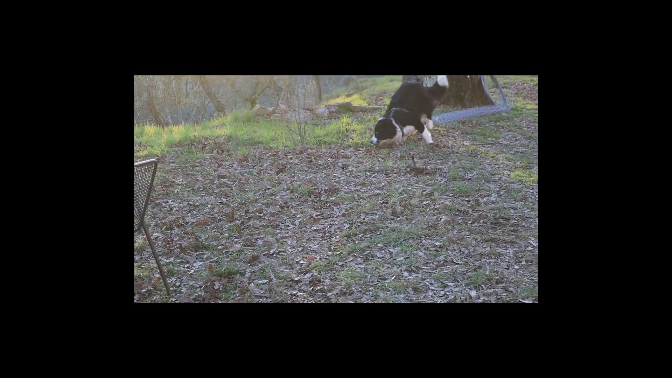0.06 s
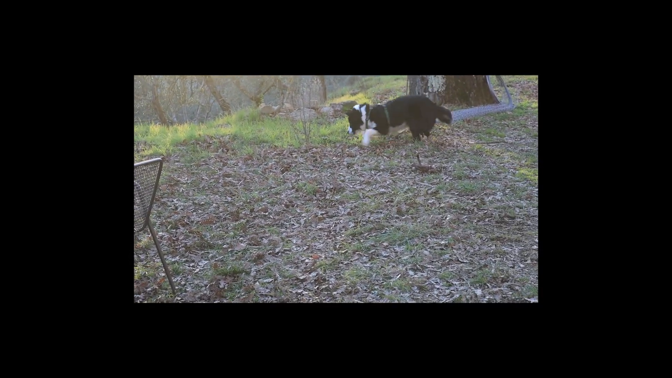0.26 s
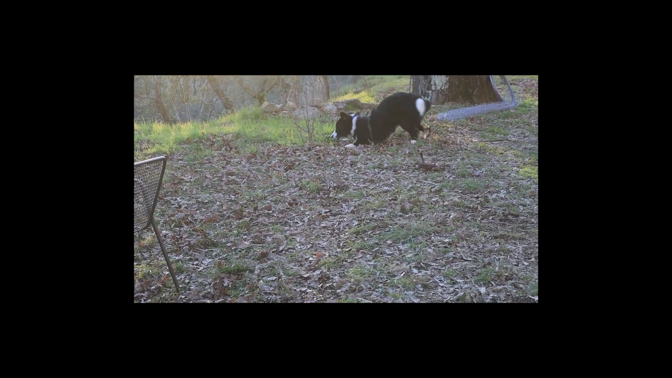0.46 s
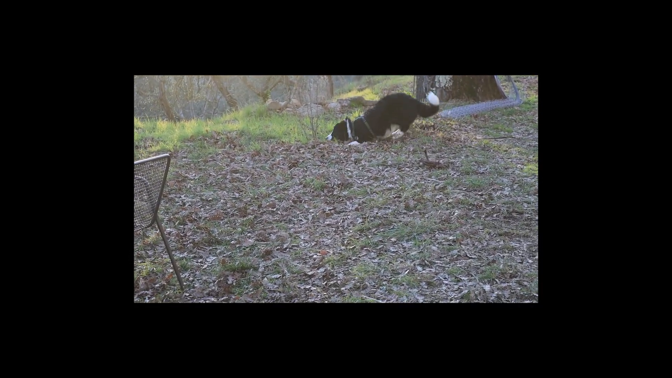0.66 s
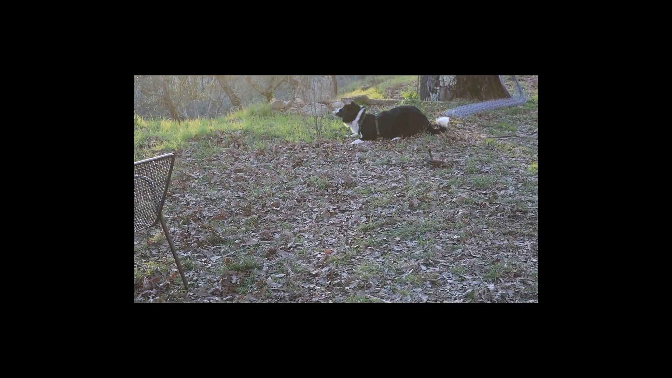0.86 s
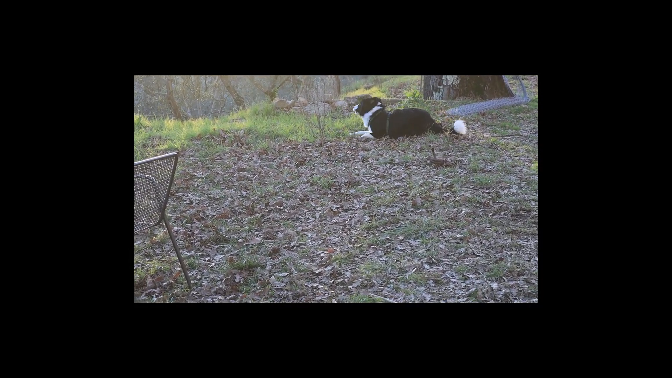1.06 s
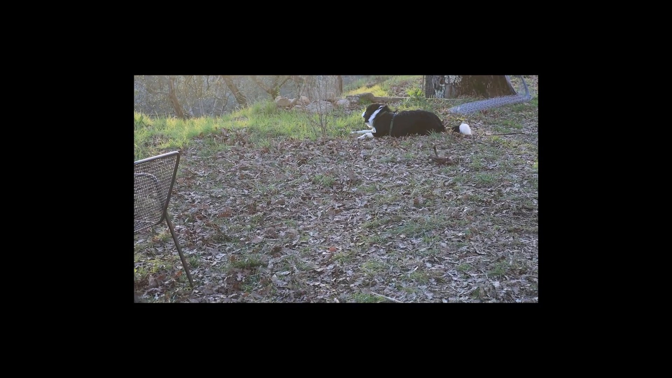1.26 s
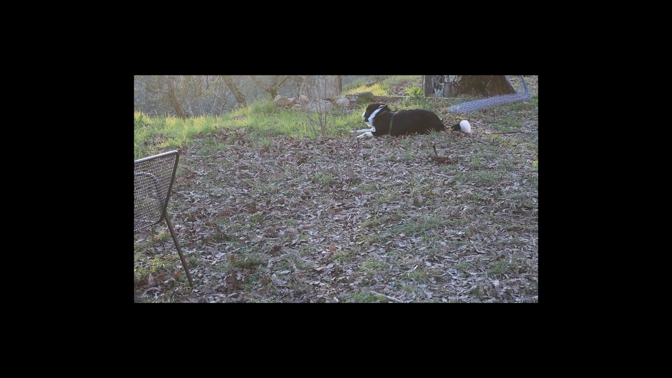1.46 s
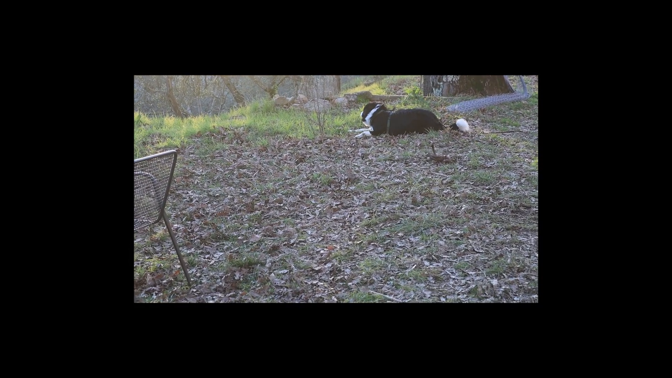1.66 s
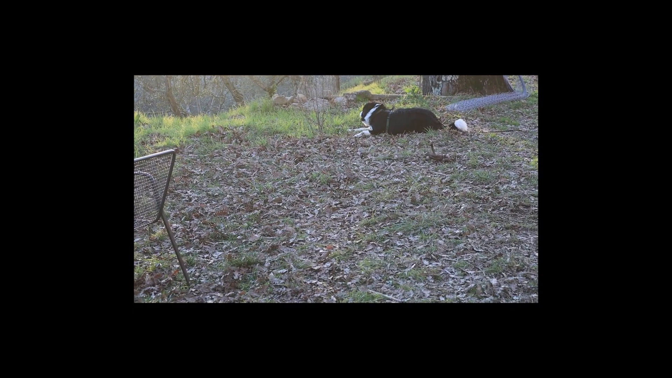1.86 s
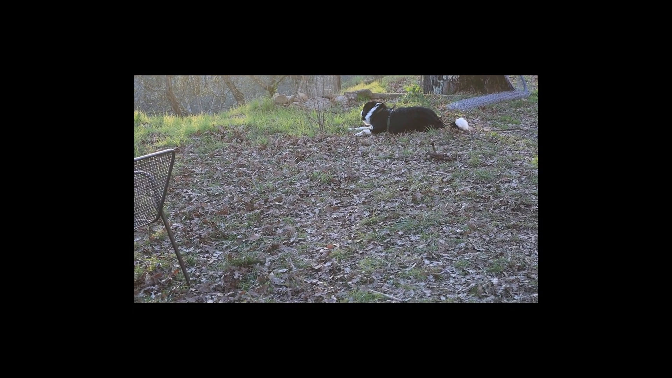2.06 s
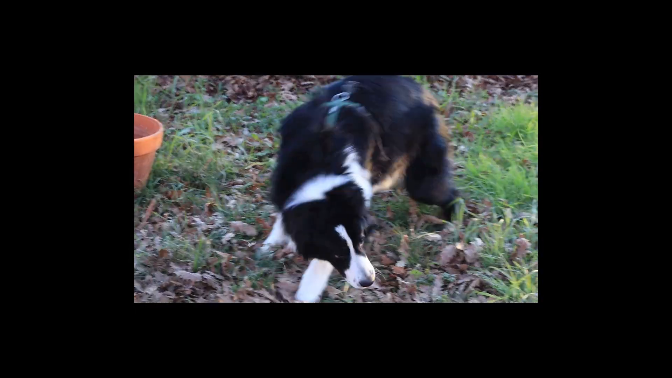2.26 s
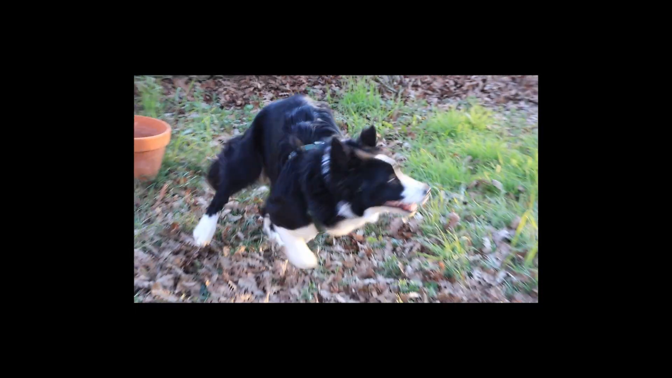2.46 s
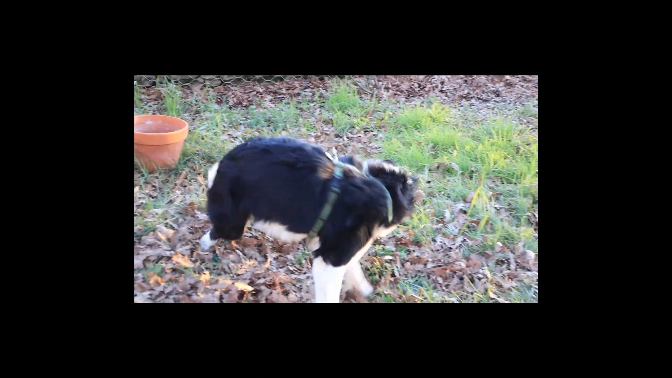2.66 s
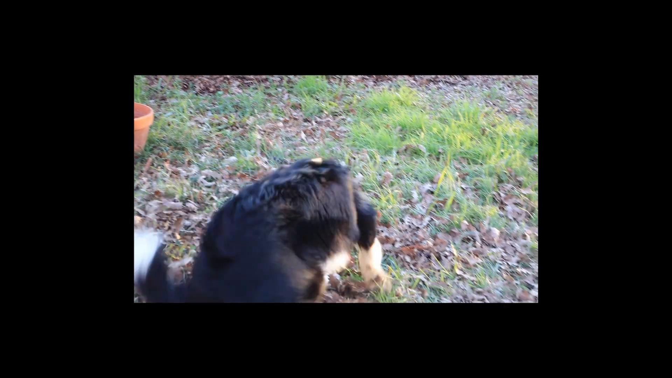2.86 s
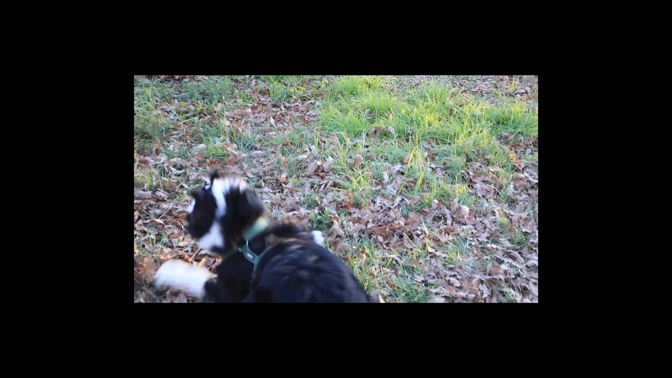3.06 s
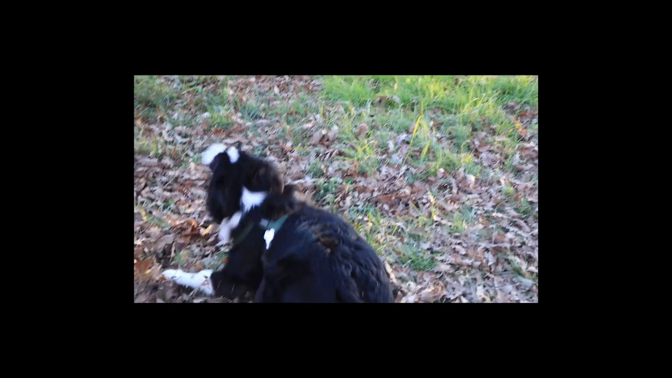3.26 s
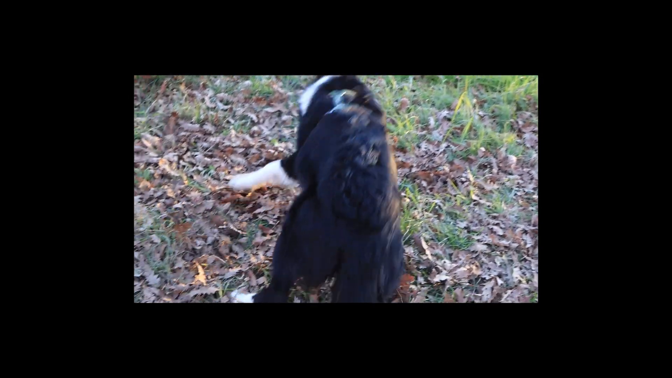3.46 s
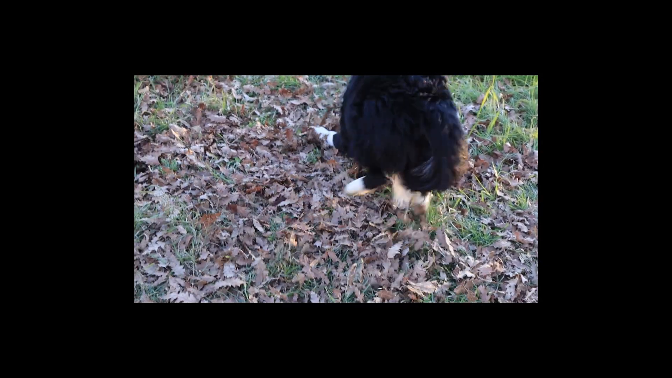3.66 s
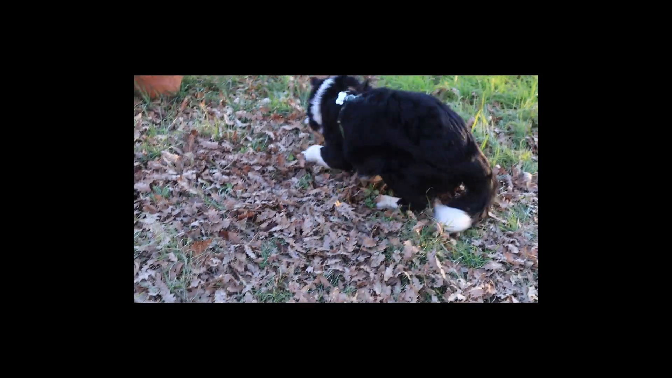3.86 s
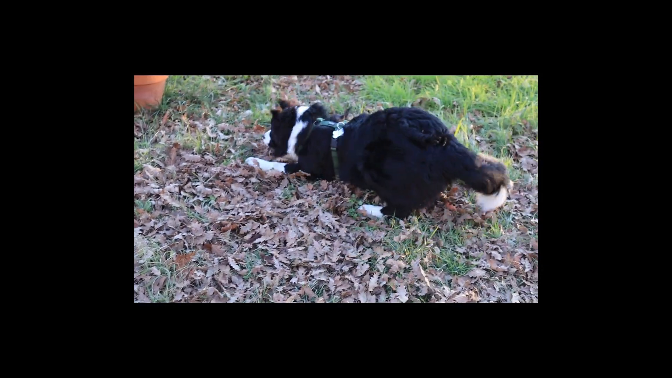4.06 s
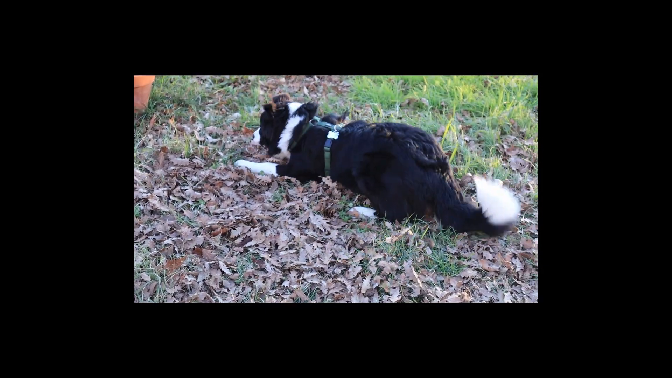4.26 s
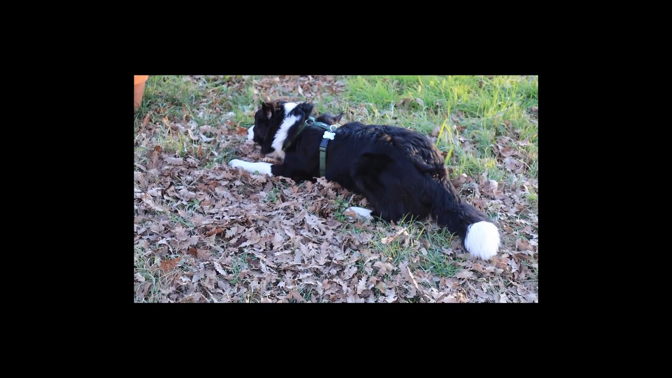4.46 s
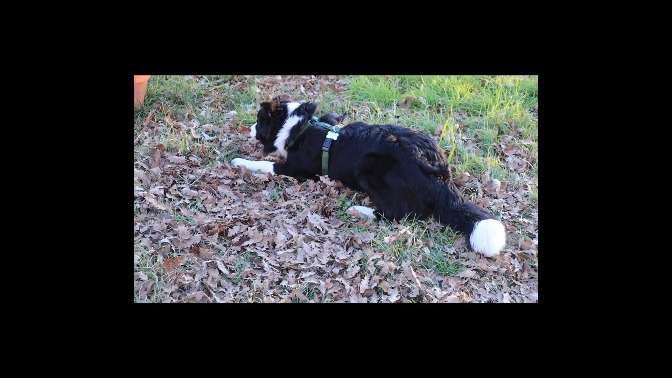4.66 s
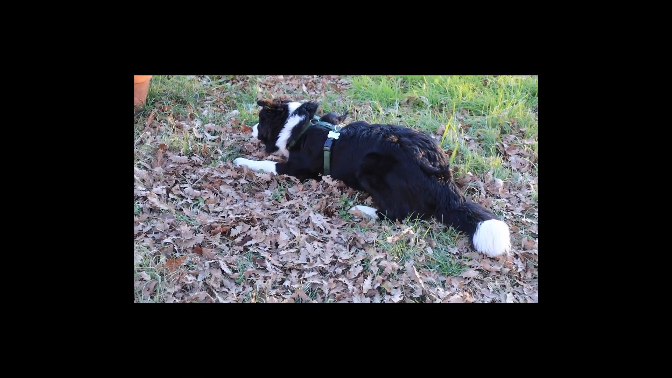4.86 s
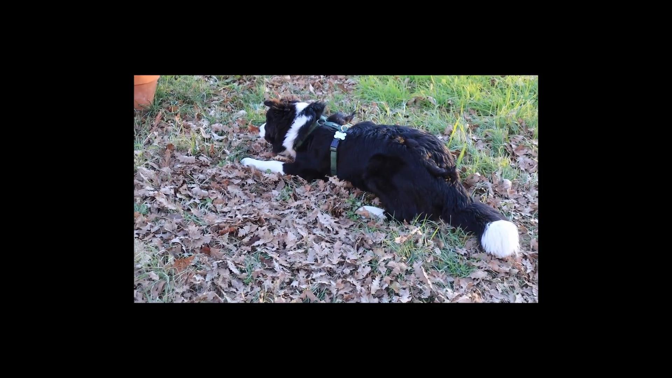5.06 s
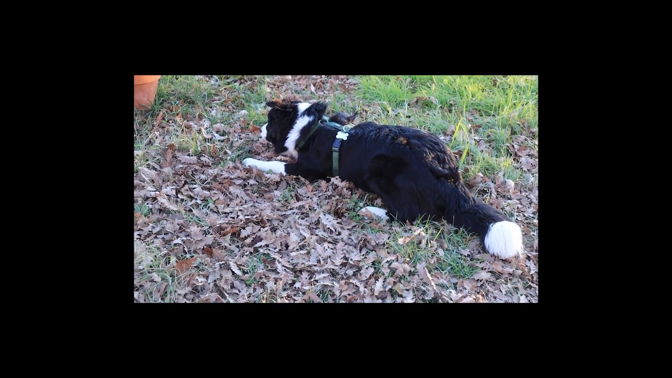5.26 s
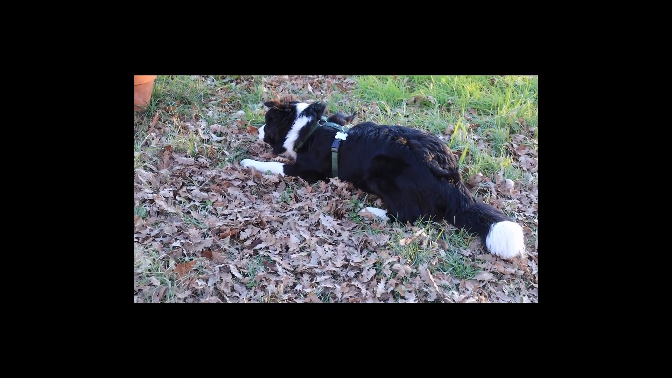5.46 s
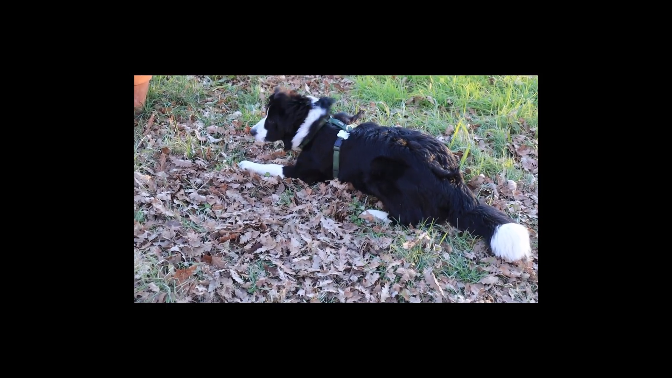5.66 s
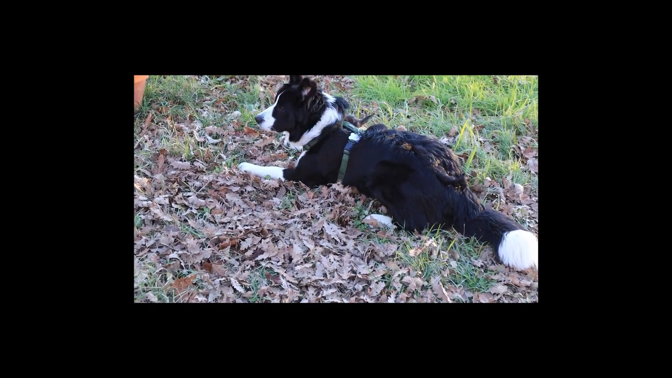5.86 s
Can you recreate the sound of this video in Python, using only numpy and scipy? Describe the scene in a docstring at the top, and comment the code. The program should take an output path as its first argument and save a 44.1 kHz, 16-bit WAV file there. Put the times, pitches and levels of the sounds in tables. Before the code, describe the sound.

A quiet open yard with soft outdoor hush. From 0 to about 1.4 s a dog scuffles in dry leaves at a distance: short, blurred rustling bursts, strongest in the first half second, fading into a lull. At 1.7 s two very quick, faint hollow knocks sound far away with a scattered echo. At 2.25 s the perspective jumps close: bright, crisp leaf crunching in irregular bursts, with paw stamps and dull soil thuds. A loud hard bump on the camera comes at 2.55-2.65 s, with low wind rumble around it. The densest crunching and sharp snaps fall around 2.7-3.2 s; tiny metallic tag clinks come near 2.45, 2.8, 3.3 and 4.05 s. More crushing continues around 3.6-4.1 s, then thins. From 4.4 s leaves tick and settle while a faint wavering drone drifts far off. From 5.4 s small snaps and a gentle rustle grow under the lying dog until the end.

```python
"""A dog scuffles through dry leaves across a yard, then a hollow double knock comes from afar in the lull.
It goes on close by: paws crush leaves, stalks snap, its collar tag clinks, and something bumps the camera.
At last the leaves settle and rustle under the lying dog, over faint outdoor air, low wind and a faint far drone.
Leaves are swarms of tiny noise clicks, hard objects are dying sine modes, and air and wind are filtered noise."""
import sys
import numpy as np
from scipy import signal
from scipy.fft import rfft, irfft
from scipy.io import wavfile
from scipy.ndimage import uniform_filter1d

SR = 44100
rng = np.random.default_rng(int(sys.argv[2]) if len(sys.argv) > 2 else 0)


def waveform_to_disk(signal):
    """Save audio, clipped to [-1, 1], as 16-bit WAV at the path in sys.argv[1]."""
    frames = np.transpose(np.atleast_2d(signal))
    scaled = np.clip(frames, -1, 1) * 32767
    samples = np.round(scaled).astype(np.int16)
    wavfile.write(sys.argv[1], SR, samples)


N = 260631
TIME = np.arange(N) / SR
NEAR_FROM, LYING_FROM = 2.24, 5.49  # s, the dog is close by, then lying in the leaves


def amp(db):
    """Decibels to gain."""
    return 10 ** (np.asarray(db) / 20)


def unit(x):
    """Scales to rms 1."""
    return x / np.sqrt(np.mean(x ** 2) + 1e-20)


def add(mix, s, sound):
    """Mixes a sound in at time s, cut off at the end of the mix."""
    part = mix[round(s * SR):][:len(sound)]
    part += sound[:len(part)]


def shape(points, hz):
    """Gain of a spectrum (Hz, dB) at the given frequencies, interpolated over log frequency."""
    f, db = np.transpose(points)
    return amp(np.interp(np.log(hz + 1), np.log(f), db))


def coloured(x, points):
    """Gives x a spectrum, at rms 1."""
    return unit(irfft(rfft(x) * shape(points, np.fft.rfftfreq(N, 1 / SR)), N))


def burst(centre_hz, decay, octaves):
    """A brief fracture: fast-dying noise in a band reaching so many octaves each way, peak 1."""
    t = np.arange(SR // 2) / SR
    edges = np.clip([centre_hz / 2 ** octaves, centre_hz * 2 ** octaves], 20, SR / 2 - 100)
    band = signal.butter(1, edges, "band", fs=SR, output="sos")
    x = signal.sosfilt(band, rng.standard_normal(len(t)) * np.exp(-t / decay))
    return x / abs(x).max()


def ring(modes):
    """Dying modes after one blow, each starting at a random phase."""
    t = np.arange(SR // 2) / SR
    out = np.zeros(len(t))
    for hz, db, t60 in modes:
        out += amp(db - 60 * t / t60) * np.sin(2 * np.pi * (hz * t + rng.random()))
    return out


# Colour of the outdoor hush. Each row: frequency in Hz, relative level in dB per Hz.
AIR = [(60, -1), (160, -5.5), (300, -8), (470, -9.5), (930, -14), (2500, -19), (6000, -21), (15800, -25.5)]
AIR_DB = -64.5
# Colour of the wind on the microphone. Each row: frequency in Hz, relative level in dB per Hz.
WIND = [(8, -9.5), (25, 8.5), (45, -2), (70, -13), (130, -25), (300, -43), (900, -92)]
# Swells of the wind. Each row: time of the top in seconds, half width in seconds, level in dB.
GUSTS = [(2.68, 0.21, -46), (3.38, 0.09, -48), (4.3, 0.58, -56), (5.45, 0.25, -55)]
CALM_DB = -64  # wind between the swells


def air():
    """Even outdoor hush, and a low wind rumble whose power swells once the dog is near."""
    hush = amp(AIR_DB) * coloured(rng.standard_normal(N), AIR)
    gust_power = sum((amp(db) * np.exp(-((TIME - s) / width) ** 2 / 2)) ** 2 for s, width, db in GUSTS)
    strength = np.sqrt(amp(CALM_DB) ** 2 + gust_power * (TIME > NEAR_FROM))
    return hush + strength * coloured(rng.standard_normal(N), WIND)


# A faint far drone that drifts in pitch. Each row: time in seconds, pitch in Hz, level in dB.
DRONE = [(4.4, 515, -81), (4.719, 495, -68), (4.949, 400, -72), (5.2, 414, -72.5), (5.6, 478, -74)]


def drone(width_hz=36):
    """A narrow, fuzzy tone from far away: slow noise riding on a gliding sine."""
    s, hz, db = np.transpose(DRONE)
    slow = signal.butter(2, width_hz, fs=SR, output="sos")
    fuzz = unit(signal.sosfilt(slow, rng.standard_normal(N)))
    glide = np.sin(2 * np.pi * np.cumsum(np.interp(TIME, s, hz)) / SR)
    return unit(fuzz * glide) * np.interp(TIME, s, amp(db), left=0, right=0)


# Blows on something hollow. Each row: start in seconds, level in dB.
KNOCKS = [(1.722, -55.5), (1.7895, -57)]
# Modes of the hollow thing. Each row: frequency in Hz, relative level in dB, time to fall 60 dB in seconds.
HOLLOW = [(453, 2, 0.23), (608, -4, 0.12), (688, -2, .08), (807, 3.5, 0.094), (885, -1.5, 0.19),
          (1010, -15, .1), (1147, -11.5, 0.21)]


def far_knocks():
    """Something hollow is struck twice beyond the yard; its modes speak softly into a scattered echo."""
    out, t = np.zeros(N), np.arange(SR // 2) / SR
    for s, db in KNOCKS:
        add(out, s, amp(db) * ring(HOLLOW) * (1 - np.exp(-t / 0.00071)))
    echo = rng.standard_normal(len(t)) * amp(-60 * t / 0.34)
    return out + amp(1.5) * signal.oaconvolve(out, echo / np.linalg.norm(echo))[:N]


# Modes of the metal collar tag. Each row: frequency in Hz, relative level in dB, time to fall 60 dB in seconds.
TAG = [(6236, -2, 0.1), (6430, 1, 0.081), (7650, 3, 0.11), (9200, -10, .066), (9700, -2.5, .04),
       (13348, -8, 0.051), (13600, 5, 0.042)]
# Clinks of the tag. Each row: start in seconds, level in dB.
CLINKS = [(2.454, -46), (2.775, -36), (2.792, -44), (3.292, -31), (4.06, -39)]


def tag():
    """The dog's collar tag clinks: each blow sets its high metal modes ringing."""
    out = np.zeros(N)
    for s, db in CLINKS:
        add(out, s, amp(db) * ring(TAG))
    return out


# Bumps on the camera. Each row: start in seconds, contact level in dB, hardness as the contact's
# upper frequency limit in Hz, level of the mount's sway in dB.
BUMPS = [(2.5491, -13, 1380, -37.5), (2.6307, -20, 15000, -38), (2.6306, -17.5, 10500, -23.5),
         (2.6351, -26.5, 6500, -58)]
# Boom and brief ring of the case. Each row: frequency in Hz, relative level in dB, time to fall 60 dB in seconds.
CAMERA = [(189, -17, 0.17), (265, -11.5, 0.057), (710, -7.5, .01), (936, -2.5, 0.018), (1300, -4.5, .012),
          (1590, -5.5, 0.014), (2224, -6.5, .012), (3170, 4, 0.0097), (3750, -2.5, .009),
          (4100, 5.5, 0.0082), (4700, -0.5, 0.019), (5680, 9.5, 0.0084), (7700, -11, 0.013),
          (9700, 0.5, 0.016), (11100, 3.5, 0.011), (12800, 0.5, .01)]


def bumps(sway_hz=44, sway_t60=0.34, push_time=0.0011):
    """A contact pushes the camera and rings its case, brighter when harder, and sets its mount swaying."""
    out, t = np.zeros(N), np.arange(SR // 2) / SR
    sway = np.sin(2 * np.pi * sway_hz * t) * amp(-60 * t / sway_t60)
    push = amp(-8) * (1 - t / push_time) * np.exp(-t / push_time)
    for s, db, hard_hz, sway_db in BUMPS:
        hardness = signal.butter(3, min(hard_hz, SR / 2 - 100), fs=SR, output="sos")
        scrape = amp(10.5) * burst(4600, decay=0.0018, octaves=0.9)
        thump = amp(-2) * burst(89, decay=0.025, octaves=0.47)
        contact = signal.sosfilt(hardness, push + ring(CAMERA) + scrape)
        add(out, s, amp(db) * contact + amp(sway_db) * (sway + thump))
    return out


# Far landings of the dog. Each row: time of the top in seconds, level in dB, rise in dB per second.
POUNCES = [(0.018, -40, 450), (0.052, -44, 300), (0.222, -44.5, 419), (0.355, -46.5, 398), (0.39, -54, 400),
           (0.474, -40.5, 365), (0.678, -50.5, 164), (0.812, -48, 322), (1.135, -48, 74.5),
           (1.328, -55, 131)]
POUNCE_FADE_DB_PER_S = 164
# shuffling between the landings: crackle level, when it starts to fade, and the fade
SHUFFLE_DB, SHUFFLE_END_S, SHUFFLE_FADE_DB_PER_S = -63.5, 1.335, 55
# low crunch: dB re the crackle when that is at -50 dB, and the dB it gains for each dB of crackle
FAR_CRUNCH_DB, CRUNCH_GROWTH = -7.5, 0.75


def pounces():
    """Far landings swell and die over light shuffling; crunch varies less. Gains of crackle and crunch."""
    shuffle_fade = SHUFFLE_FADE_DB_PER_S * np.maximum(TIME - SHUFFLE_END_S, 0)
    power = amp(SHUFFLE_DB - shuffle_fade) ** 2
    for s, db, rise in POUNCES:
        drop = np.maximum(rise * (s - TIME), POUNCE_FADE_DB_PER_S * (TIME - s))
        power = power + amp(db - drop) ** 2
    typical = amp(-50)
    bright = np.sqrt(power)
    return bright, typical * amp(FAR_CRUNCH_DB) * (bright / typical) ** CRUNCH_GROWTH


# leaves settling: start, crackle level, fade, and low crunch in dB re the crackle
SETTLE_S, SETTLE_DB, SETTLE_DB_PER_S, SETTLE_CRUNCH_DB = 4.44, -60, 16.5, -1


def settling():
    """Gain of the crackle of flattened leaves slowly coming to rest."""
    return (TIME > SETTLE_S) * amp(SETTLE_DB - SETTLE_DB_PER_S * np.maximum(TIME - SETTLE_S, 0))


# ticks of settling leaves: mean rate, largest peak at the start, fade, range of sizes
TICKS_PER_S, TICK_DB, TICK_DB_PER_S, TICK_RANGE_DB = 70, -37.5, 7.5, 25
FAR_TICKS_PER_S, FAR_TICK_DB = 70, 11  # under the landings: mean rate, largest peak in dB re the crackle


def ticks(count=6):
    """Single leaves flick under the far landings and as the leaves settle: random bursts of several kinds."""
    settle = (TIME > SETTLE_S) * amp(TICK_DB - TICK_DB_PER_S * np.maximum(TIME - SETTLE_S, 0))
    far = pounces()[0] * amp(FAR_TICK_DB)
    out = np.zeros(N)
    for _ in range(count):
        chance, size = rng.random((2, N))
        size = amp(-TICK_RANGE_DB * size)
        settle_hits = (chance < TICKS_PER_S / count / SR) * size * settle
        far_hits = (chance < FAR_TICKS_PER_S / count / SR) * size * far
        out += signal.oaconvolve(settle_hits, burst(5200, decay=0.0011, octaves=1.1))[:N]
        out += signal.oaconvolve(far_hits, burst(3100, decay=0.0025, octaves=1.0))[:N]
    return out


# Single leaves and stalks snapping. Each row: start in seconds, level in dB, centre in Hz.
SNAPS = [(2.652, -26, 4200), (2.837, -18, 6960), (2.859, -15, 8000), (3.782, -23.5, 7000),
         (4.117, -21, 7900), (4.153, -30, 8000), (4.322, -31, 8000), (4.3425, -27, 8000),
         (4.353, -27, 7000), (4.384, -26.5, 8000), (4.450, -29, 7000), (4.536, -33, 4800),
         (4.578, -37, 7940), (4.653, -33, 7850), (4.829, -38.5, 7000), (4.731, -41, 4500),
         (5.374, -47, 7000), (4.893, -41, 4000), (5.111, -48, 7000), (5.4217, -39, 7430),
         (5.4468, -41.5, 4530), (5.468, -32, 7450), (5.686, -27.5, 3500), (5.750, -34, 6000)]


def snaps():
    """A dry stalk cracks in a sharp broadband click, and the leaves round it shiver."""
    out = np.zeros(N)
    for s, db, hz in SNAPS:
        crack = burst(hz, decay=0.0008, octaves=0.6)
        shiver = amp(-14.5) * burst(hz, decay=0.004, octaves=1.2)
        add(out, s, amp(db) * (crack + shiver))
    return out


def crackle(per_s, spread_db, decay, hiss, count=32):
    """Countless tiny fractures of uneven size, each leaf with its own brief ring, over the hiss of sliding."""
    t = np.arange(SR // 100) / SR
    size = amp(spread_db * np.minimum(rng.exponential(1, N), 4))
    clicks = size * (rng.random(N) < per_s / SR) / np.sqrt(per_s)
    leaf = rng.integers(0, count, N)
    rings = rng.standard_normal((count, len(t))) * np.sqrt(t / decay) * np.exp(-t / decay)
    grains = sum(signal.oaconvolve(clicks * (leaf == k), unit(rings[k]))[:N] for k in range(count))
    return unit(unit(grains) + hiss * rng.standard_normal(N))


def patchy(x, depth_db, size=7):
    """Each crushed clump has its own colour: random patches of the spectrum last hundredths of a second."""
    z = signal.stft(x, nperseg=256, noverlap=192)[2]
    patches = uniform_filter1d(rng.standard_normal(z.shape), size, 0)  # across frequency
    patches = uniform_filter1d(patches, 2 * size, 1)  # across time
    return unit(signal.istft(z * amp(depth_db * unit(patches)), nperseg=256, noverlap=192)[1][:N])


def litter(grains, colour, crackle_gain, crunch_gain, split_hz):
    """Loose top leaves give the bright part of the rustle, the pressed layer below them the low part."""
    hz = np.fft.rfftfreq(N, 1 / SR)
    z = rfft(grains) * shape(colour, hz)
    low_share = 1 / (1 + (hz / split_hz) ** 3)
    bright = unit(irfft(z * (1 - low_share), N))
    low = unit(irfft(z * low_share, N))
    return crackle_gain * bright + crunch_gain * low


# Colour of the leaves underfoot close by. Each row: frequency in Hz, relative level in dB per Hz.
NEAR_LEAVES = [(60, -9), (200, -6.5), (400, -6.5), (1000, -1.5), (2000, 1), (4800, 1.5), (6200, -1.5),
               (7500, 4.5), (8500, 4), (9300, -2.5), (10100, -8.5), (11600, -1.5), (13300, -3),
               (15800, -10)]
# Paws stamping into the leaves. Each row: start in seconds, level in dB before the soft onset,
# decay time in seconds (the width of a bell-shaped fall).
STEPS = [(2.279, -28, 0.021), (2.532, -30.5, 0.019), (2.603, -26.5, 0.007), (2.707, -23, 0.017),
         (2.888, -22, 0.01), (3.102, -23, 0.012), (3.167, -23.5, 0.02), (3.613, -27.5, 0.011),
         (3.636, -28, .025), (3.703, -30, 0.02), (3.813, -29, 0.028), (4.068, -31, 0.019),
         (4.311, -37.5, 0.0078)]
# Thuds on the soil. Each row: start in seconds, level in dB before the soft onset.
SOIL_THUDS = [(2.39, -44), (2.71, -62), (2.89, -54), (3.17, -48), (3.38, -52), (3.70, -68), (4.08, -43),
              (4.895, -58), (5.27, -52.5), (5.52, -56.5)]


def paws():
    """Each stamp crushes a clump of leaves at once; separate low thuds sound on the soil."""
    crush, press = np.zeros(N), np.zeros(N)
    t = np.arange(SR // 3) / SR
    for s, db, decay in STEPS:
        add(crush, s, amp(db) * (1 - np.exp(-t / 0.0025)) * np.exp(-(t / decay) ** 2 / 2))
    for s, db in SOIL_THUDS:
        add(press, s, amp(db) * (1 - np.exp(-t / 0.004)) * np.exp(-t / 0.021))
    clump = patchy(crackle(5000, spread_db=3.5, decay=0.00052, hiss=0.48), depth_db=2.5)
    crunch = coloured(clump, NEAR_LEAVES)
    soil = coloured(rng.standard_normal(N), [(20, -12), (60, 1.5), (220, 4.5), (600, -19), (2500, -49)])
    return crush * crunch + press * soil


# Legs, body and tail sweeping through the leaves close by. Each row: start in seconds, length in seconds,
# crackle level in dB before attack and sag, low crunch of the pressed litter in dB re the crackle.
SWEEPS = [(2.24, .03, -49.5, -8), (2.268, 0.042, -38.5, -8.5), (2.338, 0.043, -33, -10.5),
          (2.406, 0.082, -41, -3.5), (2.522, 0.027, -39.5, -0.5), (2.582, 0.043, -36.5, -4.5),
          (2.658, 0.059, -39.5, -6.5), (2.733, 0.052, -27.5, -11), (2.814, 0.08, -31.5, -10.5),
          (2.89, 0.053, -25.5, -17.5), (2.938, 0.089, -27, -13), (3.076, 0.1, -35, -7.5),
          (3.157, 0.074, -28.5, -10.5), (3.271, .18, -43, -4.5), (3.455, 0.1, -38, -12.5),
          (3.53, 0.1, -36.5, -7), (3.613, 0.084, -30, -11.5), (3.697, 0.027, -29, -10.5),
          (3.745, 0.041, -40.5, -7), (3.825, 0.014, -30.5, -16), (3.871, 0.087, -38, -8),
          (3.965, 0.052, -35.5, -6.5), (4.045, 0.043, -34, -8.5), (4.112, 0.036, -44.5, -6.5),
          (4.17, .13, -50, -6), (4.293, 0.12, -44, -6.5), (4.606, 0.062, -57, -5.5), (5.397, 0.11, -70, 4),
          (5.496, .04, -58, -10), (5.533, 0.076, -54, -5), (5.598, 0.055, -50, -9.5),
          (5.645, .12, -48, -6.5), (5.767, 0.12, -45.5, -8.5)]
# every sweep: attack s, sag dB per s, release s, and how abruptly the release ends
SWEEP_ATTACK_S, SWEEP_SAG_DB_PER_S, SWEEP_RELEASE_S, SWEEP_RELEASE_POWER = 0.0088, 12, 0.038, 1.34


def sweeps():
    """Each sweep catches the leaves, sags a little and lets them fall back. Gains of crackle and crunch."""
    bright, low = settling(), settling() * amp(SETTLE_CRUNCH_DB)
    for s, length, db, crunch_db in SWEEPS:
        t = np.maximum(TIME - s, 0)
        release = np.exp(-(np.maximum(t - length, 0) / SWEEP_RELEASE_S) ** SWEEP_RELEASE_POWER)
        stir = amp(db - SWEEP_SAG_DB_PER_S * t) * (1 - np.exp(-t / SWEEP_ATTACK_S)) * release
        bright, low = np.hypot(bright, stir), np.hypot(low, stir * amp(crunch_db))
    return bright, low


# Colour of the leaves far off. Each row: frequency in Hz, relative level in dB per Hz.
FAR_LEAVES = [(100, -7), (280, -2.5), (450, 0.5), (1000, -1), (1700, 1), (2700, -3.5), (4800, -0.5),
              (6200, -2), (8300, 1), (9100, -5), (10100, -10), (11500, -7), (13700, -9), (15800, -14)]
# Colour of the leaves under the lying dog. Each row: frequency in Hz, relative level in dB per Hz.
LYING_LEAVES = [(60, -3), (140, 6), (330, -6), (900, 1), (3400, -0.5), (4900, -0.5), (6100, -9),
                (7400, 0.5), (8200, -1), (9500, -7), (13000, -7.5), (15800, -13)]


def leaves():
    """The harder the dog stirs, the more leaves break at once close by; from afar the grains blur."""
    bright, low = np.where(TIME < NEAR_FROM, pounces(), sweeps())
    level_db = 20 * np.log10(bright + 1e-6)
    per_s = 2800 * amp(0.3 * (level_db + 40))  # fractures per second, 2800 at a crackle of -40 dB
    close = patchy(crackle(per_s, spread_db=3.5, decay=0.00058, hiss=0.9), depth_db=1.5)
    blurred = patchy(crackle(4000, spread_db=2.0, decay=0.0012, hiss=0.84), depth_db=1.43)
    far = litter(blurred, FAR_LEAVES, bright * amp(-0.5), low * amp(1.16), split_hz=2300)
    near = litter(close, NEAR_LEAVES, bright * amp(0.06), low * amp(-0.3), split_hz=1490)
    lying = litter(close + blurred, LYING_LEAVES, bright * amp(-0.9), low * amp(2.2), split_hz=2360)
    return np.select([TIME < NEAR_FROM, TIME < LYING_FROM], [far, near], lying)


def scene():
    """All sources at one microphone."""
    background = air() + drone() + far_knocks()
    dog = tag() + ticks() + snaps() + paws() + leaves()
    return (background + bumps() + dog)[None]


EDGE_HZ = 15850  # top of the audible band that is kept


def record(dry, ceiling=1.6):
    """The microphone rounds off the hardest peaks; then a steep low-pass limits the band."""
    rounded = ceiling * np.tanh(dry / ceiling)
    low_pass = signal.firwin(511, EDGE_HZ, window=("kaiser", 9), fs=SR)
    return signal.oaconvolve(rounded, low_pass[None], "same")


dry = scene()
out = record(dry)
waveform_to_disk(out)
```